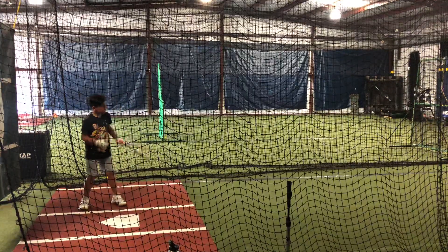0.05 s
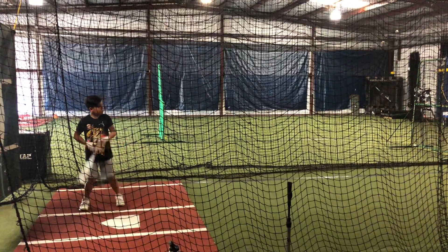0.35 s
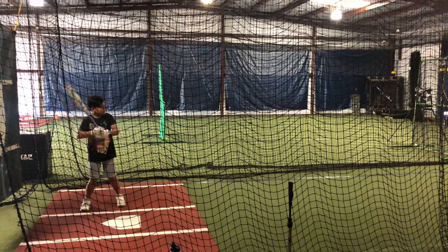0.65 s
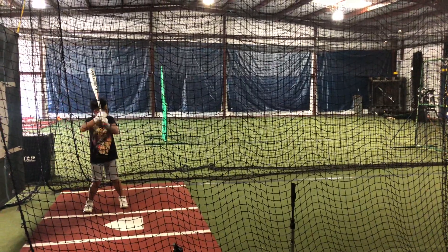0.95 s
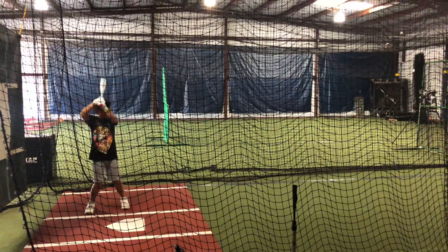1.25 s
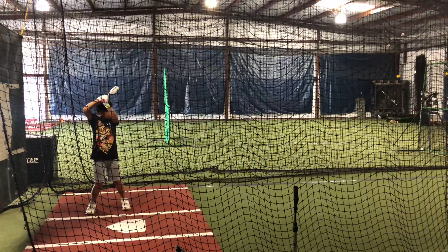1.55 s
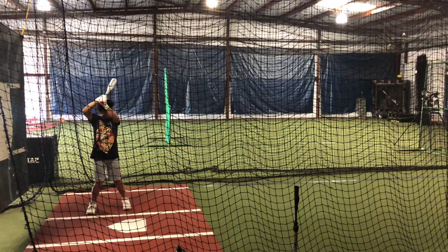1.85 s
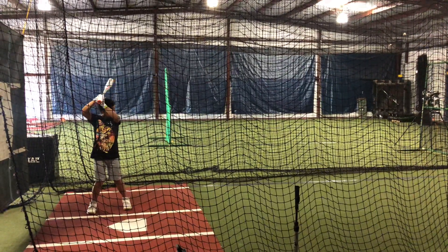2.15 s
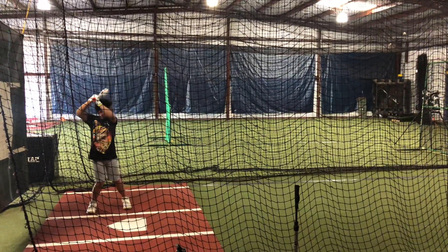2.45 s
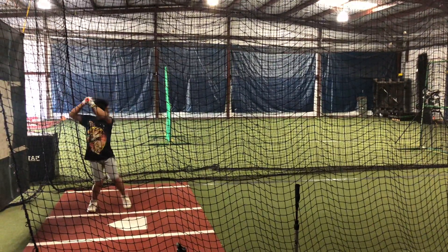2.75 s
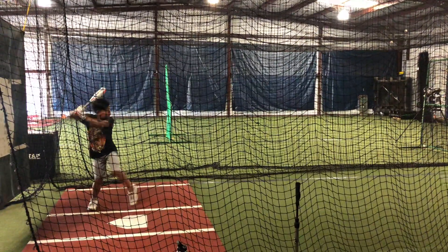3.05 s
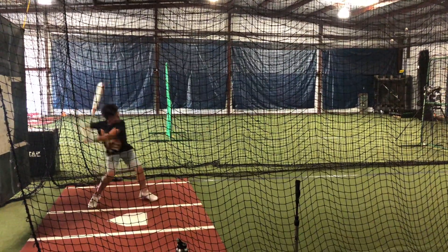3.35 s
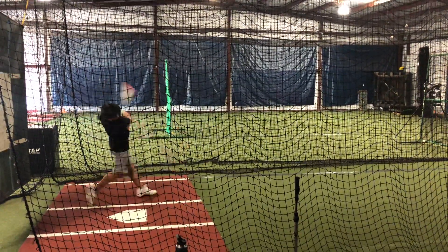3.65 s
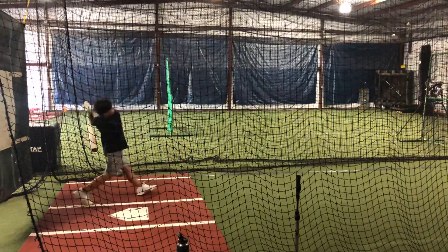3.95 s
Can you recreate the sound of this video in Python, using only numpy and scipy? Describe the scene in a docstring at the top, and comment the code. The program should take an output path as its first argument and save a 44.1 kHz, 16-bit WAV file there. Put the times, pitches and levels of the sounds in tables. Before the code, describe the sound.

A bat hits a ball with a sharp crack that echoes through an indoor batting cage. Before it, a pitching machine hums quietly, then throws with a ringing thump. Afterwards the ball thuds into netting and padding.

```python
"""A bat cracks a ball in an indoor batting cage: a short dry snap, echoes off the walls and roof,
and a hall that holds the bat's ring. Just after, the ball thuds into the netting and padding.
Half a second before the hit, a pitching machine throws the ball from between two spinning wheels.
The machine buzzes, ticks and hums throughout, over faint lamps and a steady hiss of air."""
import sys
import numpy as np
from scipy import signal
from scipy.fft import rfft, irfft
from scipy.io import wavfile

SR = 44100
rng = np.random.default_rng(int(sys.argv[2]) if len(sys.argv) > 2 else 0)


def inscribe(sig):
    """Save sig as 16-bit PCM at rate SR to the path in sys.argv[1].

    A 1-D sig is mono; a 2-D sig holds one channel per row.
    Samples are clipped to [-1, 1] before scaling.
    """
    pcm = np.round(np.clip(np.atleast_2d(sig).T, -1, 1) * 32767)
    wavfile.write(sys.argv[1], SR, pcm.astype(np.int16))


N = 176400
T = np.arange(N) / SR
HZ = np.fft.rfftfreq(N, 1 / SR)
HIT_S, HALL_DELAY_S = 3.5424, 0.014


# Tone of the snap as bat meets ball: pitch_hz, relative_db
SNAP_TONE = [(100, -29), (1500, -1), (5000, 12.5), (9000, 2.5), (12000, 9.5), (15000, 11)]
# Tone of the ball being squashed: pitch_hz, relative_db
CRUNCH_TONE = [(60, -2), (300, -2), (650, -7), (1000, 12), (1500, 3.5), (2100, 1), (2800, 7), (5000, -2.5),
               (7500, -11), (10000, -6), (12200, -26), (15000, -15)]
# Notes that bat and ball ring at: pitch_hz, relative_db, ring_s (time to fade by 60 dB)
BAT_NOTES = [(860, -2.5, .011), (1025, -2, 0.018), (1600, -6, 0.02), (1840, -14, 0.029),
             (2740, 2.5, 0.0094), (3330, -18, 0.029), (4400, -20, 0.0052)]

def bat_crack():
    """The bat hits the ball: a bright snap, a hollow crunch and a ring that dies quickly."""
    snap = unit(colour(burst(HIT_S, decay_s=0.0001), amp(read(SNAP_TONE, HZ))))
    crunch = unit(colour(burst(HIT_S, decay_s=0.0035), amp(read(CRUNCH_TONE, HZ))))
    notes = ring(HIT_S + 0.000808, BAT_NOTES)  # starts as the ball leaves the bat
    return amp(17.5) * snap + amp(12.5) * crunch + amp(-5.5) * notes


# Tone the hit sends into the hall: pitch_hz, relative_db
ECHO_TONE = [(40, -36), (150, -1), (300, -2), (500, -0.5), (900, 0), (1350, 0), (2100, 2.5), (3300, -1),
             (4300, -0.5), (6000, -5), (9500, -9.5), (12200, -16), (15000, -12)]
# Where the bat's barrel rings: pitch_hz, width_hz, relative_db
BARREL_PEAKS = [(1609, 64, 13.7), (1720, 110, 3.5), (2460, 140, 3.1), (2600, 102, 10.5), (4120, 93, 1.5)]
# Bounces off the walls and roof: delay_s, relative_db, decay_s
WALL_SLAPS = [(0.015, 1.5, 0.0068), (0.0196, -8, 0.0012), (0.0233, -1, 0.0021), (0.03, -4, 0.0055),
              (0.0401, -4.5, 0.0033), (0.075, -11, 0.0035), (.082, -13, .004), (.088, -2, 0.012),
              (.131, -10, 0.0082), (0.214, -12.5, 0.022)]

def bat_echoes():
    """The crack comes back as slaps, duller the later they are, and a long tail with the bat's ring."""
    tone = evened(np.hypot(amp(read(ECHO_TONE, HZ)), bumps(BARREL_PEAKS, HZ)))
    loss_db_per_s = 4.5 * HZ / 1000  # high pitches lose the most on the way
    slaps = sum(amp(db) * unit(colour(burst(HIT_S + delay, decay), tone * amp(-loss_db_per_s * delay)))
                for delay, db, decay in WALL_SLAPS)
    tail = unit(colour(hall(HIT_S + HALL_DELAY_S), tone))
    return amp(12) * slaps + amp(18) * tail


# The ball landing in netting and padding: start_s, level_db, pitch_hz, width_hz, decay_s
BALL_BLOWS = [(3.614, 1.5, 484, 396, 0.034), (3.768, -8, 146, 44.7, 0.041), (3.805, -4, 155, 35.8, 0.14)]

def ball_thuds():
    """The ball lands with dull blows, and the net's cords give a brief zip."""
    blows = sum(amp(db) * unit(colour(burst(start, decay), bumps([(hz, width, 0)], HZ)))
                for start, db, hz, width, decay in BALL_BLOWS)
    cords = unit(colour(burst(3.751, decay_s=0.025), bumps([(5970, 5200, 0)], HZ)))
    return blows + amp(-11) * cords


# The ball scuffing between the wheels: start_s, relative_db, decay_s
THROW_SCUFFS = [(2.992, -13, 0.0092), (2.998, -5.5, 0.016), (3.011, -9, 0.004), (3.019, -5.5, 0.01)]
# Tone of the throw: pitch_hz, relative_db
THROW_TONE = [(29, -49), (50, -22.5), (223, 0), (291, -12.5), (398, -11), (822, -12), (905, -8.5),
              (1960, -12), (3760, -13), (4140, -16), (6090, -17), (14500, -23), (16000, -27)]
# Groups of close notes in the machine's frame: pitch_hz, width_hz, level_db, ring_s
FRAME_NOTES = [(221.3, 9.6, -5, 0.5), (398, 20, -9.5, 0.34), (1070, 100, -15, 0.22),
               (1670, 110, -9.5, 0.94), (3280, 40, -16, 1), (5970, 29, -12, 1), (7970, 50, -16, 0.29)]

def machine_throw():
    """The wheels grab and throw the ball; the frame and the hall ring on."""
    scuffs = unit(sum(amp(db) * burst(start, decay) for start, db, decay in THROW_SCUFFS))
    jolt_s = THROW_SCUFFS[1][0]
    throw = unit(colour(scuffs + hall(jolt_s + HALL_DELAY_S), amp(read(THROW_TONE, HZ))))
    frame = sum(amp(db) * cluster(jolt_s, hz, width, ring_s) for hz, width, db, ring_s in FRAME_NOTES)
    return amp(2.5) * throw + frame


def batter_swing():
    """The batter's front foot scuffs the mat, then air rushes round the swinging bat."""
    scuff = evened(colour(rng.standard_normal(N), bumps([(920, 1900, 0)], HZ)))
    rush = evened(colour(rng.standard_normal(N), 1 / (1 + HZ / 350)))
    foot = amp(-55.5) * scuff * np.exp(-((T - 3.42) / 0.066) ** 2)
    swish = amp(-44.5) * rush * np.exp(-((T - 3.537) / 0.029) ** 2)
    return foot + swish


# Where the wheel's rattle is strongest: pitch_hz, width_hz, relative_db
RATTLE_PEAKS = [(1054, 134, -1), (2584, 430, -1.5), (4480, 340, -3.5), (5630, 510, 2), (6600, 110, -0.5),
                (7580, 1200, -4.5), (8800, 350, -2)]
# Where the wheel's housing rings: pitch_hz, width_hz, relative_db
HOUSING_PEAKS = [(2570, 117, -1.9), (2664, 73, 0.9)]
# How loud the housing whines over time: time_s, level_db
WHINE_LEVELS = [(0, -68), (.3, -66.5), (.7, -69), (1.15, -66), (1.45, -68), (1.75, -63), (2.2, -65),
                (2.9, -62.5), (3.3, -64)]

def wheel_buzz():
    """The faster wheel rattles once a turn and rubs three times, ringing the housing and the hall."""
    turns = wheel_turns(per_s=35.95 + 0.00676 * drift(rate_hz=0.88))
    rattles = evened(pulses(turns)) + 0.13 * rng.standard_normal(N)  # noise roughens the clicks
    rattles = rattles + amp(5.5) * signal.fftconvolve(rattles, hall(0))[:N]
    rubs = evened(pulses(turns * 3))
    buzz = evened(colour(rattles, bumps(RATTLE_PEAKS, HZ)))
    whine = evened(colour(rubs + 0.5 * evened(rattles), bumps(HOUSING_PEAKS, HZ)))
    whine_db = np.interp(T, *np.transpose(WHINE_LEVELS))
    return amp(-63) * buzz + amp(whine_db) * whine


# Tone of the wheel's thin, high tick: pitch_hz, relative_db
TICK_TONE = [(500, -53), (3000, -34), (5500, -7.5), (9500, -10), (10250, 4.5), (10650, -10), (11080, 5),
             (11400, -9.5), (12000, -6.5), (13500, -8), (14400, 1.5), (14900, -0.5), (15400, 6),
             (16000, -4)]

def wheel_ticks():
    """The slower wheel ticks once a turn: the same click, rattle and short ring every time."""
    turns_per_s, first_s = 25.273, 0.0004
    click = T == 0
    rattle = amp(-2) * burst(0, decay_s=0.0014)
    ringing = amp(-0.5) * burst(0, decay_s=0.022)
    turns = wheel_turns(turns_per_s) - first_s * turns_per_s
    ticks = signal.fftconvolve(pulses(turns), click + rattle + ringing)[:N]
    return amp(-57) * evened(colour(ticks, amp(read(TICK_TONE, HZ))))


# Low notes of the motor: pitch_hz, first_level_db, settled_level_db
MOTOR_NOTES = [(84, -47, -57), (101.5, -67, -68.5), (115.6, -50.5, -54), (129.3, -57.5, -63.5),
               (151.5, -54, -59), (164, -69, -71.5), (191, -62, -79.5), (208, -64.5, -88)]

def motor_hum():
    """The motor hums on low notes that waver and settle to a quieter level."""
    settle_span_s, waver_db, waver_hz = [0.85, 2.2], 2.6, 0.33
    hum = np.zeros(N)
    for hz, first_db, settled_db in MOTOR_NOTES:
        level_db = np.interp(T, settle_span_s, [first_db, settled_db]) + waver_db * drift(rate_hz=2.9)
        cycles = np.cumsum(hz + waver_hz * drift(rate_hz=5.3)) / SR + rng.random()
        hum += amp(level_db) * np.sin(2 * np.pi * cycles)
    return hum


# Notes in the lamps' buzz: pitch_hz, level_db
LAMP_NOTES = [(360, -80), (480, -75.5), (840, -77.5), (960, -79), (1080, -76)]

def lamp_buzz():
    """Mains power makes the lamps buzz, faint and steady."""
    return sum(amp(db) * np.sin(2 * np.pi * (hz * T + rng.random())) for hz, db in LAMP_NOTES)


# Tone of the air in the hall: pitch_hz, relative_db
AIR_TONE = [(20, -28), (40, -3), (65, 5), (130, -1), (230, -0.5), (330, -10.5), (700, -13.5), (1080, -16.5),
            (1400, -13), (2000, -15), (2600, -14), (3700, -15.5), (5700, -18.5), (7200, -17.5),
            (8700, -13.5), (9500, -18.5), (11100, -10), (12000, -19), (13500, -24), (15500, -19)]

def air_hiss():
    """The hall's air gives a steady hiss and rumble."""
    noise = irfft(rfft(rng.standard_normal(N)) * amp(read(AIR_TONE, HZ)), N)
    return amp(-55) * evened(noise)


# How long the hall takes to fade by 60 dB: pitch_hz, ring_s
HALL_RING_TIMES = [(100, 1.53), (250, 1.13), (600, 0.71), (1100, 0.77), (1650, 0.91), (2700, 0.94),
                   (4200, 1.04), (6000, 0.88), (9000, 0.64), (15000, 0.34)]

def hall(start_s, rise_s=0.0086):
    """Many echoes blur into one tail; each pitch fades at its own speed."""
    hz, t, bands = signal.stft(rng.standard_normal(N), SR, nperseg=256)
    fade = np.exp(-np.log(1000) * np.maximum(t - start_s, 0) / read(HALL_RING_TIMES, hz)[:, None])
    tail = signal.istft(bands * fade, SR)[1][:N]
    return unit(tail * np.clip((T - start_s) / rise_s, 0, 1))


def wheel_turns(per_s, throw_s=3.0):
    """Counts the turns of a wheel that drops about 5% in speed as it throws the ball."""
    return np.cumsum(per_s * np.where(T < throw_s, 1, 0.951)) / SR


def pulses(turns):
    """One sharp click at each whole turn."""
    at = np.interp(np.arange(np.ceil(turns[0]), turns[-1]), turns, np.arange(N))
    near = np.round(at).astype(int)[:, None] + np.arange(-8, 9)
    offset = near - at[:, None]
    clicks = np.sinc(offset) * np.cos(offset * np.pi / 18) ** 2  # lets a click fall between samples
    return np.bincount(near.ravel() % N, clicks.ravel(), N)


def ring(start_s, notes):
    """The pure, fading notes of something struck."""
    t = np.maximum(T - start_s, 0)
    return sum(amp(db) * np.exp(-np.log(1000) * t / ring_s) * np.sin(2 * np.pi * hz * t)
               for hz, db, ring_s in notes)


def cluster(start_s, hz, width_hz, ring_s):
    """Many close notes struck together: a wobbling ring of energy 1."""
    band = irfft(rfft(rng.standard_normal(N)) * bumps([(hz, width_hz, 0)], HZ), N)
    return unit(band * fall(start_s, ring_s / np.log(1000)))


def burst(start_s, decay_s):
    """A dying burst of noise of energy 1."""
    return unit(rng.standard_normal(N) * fall(start_s, decay_s))


def fall(start_s, decay_s):
    """Jumps to 1, then fades to about a third every decay_s."""
    return (T >= start_s) * np.exp(-np.maximum(T - start_s, 0) / decay_s)


def drift(rate_hz):
    """A slow random wander of typical size 1."""
    return evened(irfft(rfft(rng.standard_normal(N)) / (1 + (HZ / rate_hz) ** 4), N))


def colour(x, gain):
    """Turns each pitch up or down by its gain, adding no sound ahead of a hit."""
    log_gain = np.log(np.maximum(gain, 1e-5))
    mirrored = np.concatenate([log_gain, log_gain[-2:0:-1]])
    taps = np.fft.ifft(np.exp(np.conj(signal.hilbert(mirrored)))).real[:4096]
    return signal.fftconvolve(x, taps)[:N]


def bumps(peaks, hz):
    """A gain curve with a bump at each pitch where something rings."""
    return np.sqrt(sum((amp(db) / (1 + ((hz - pitch) / width) ** 2)) ** 2 for pitch, width, db in peaks))


def read(points, hz):
    """Reads between a table's rows, with octaves evenly spaced."""
    pitch, value = np.transpose(points)
    return np.interp(np.log(hz + 1), np.log(pitch + 1), value)


def amp(db):
    """Decibels to gain."""
    return 10 ** (np.asarray(db) / 20)


def evened(x):
    """Scales to an average power of 1."""
    return x / np.sqrt(np.mean(x ** 2) + 1e-20)


def unit(x):
    """Scales to a total energy of 1."""
    return x / np.sqrt(np.sum(x ** 2) + 1e-20)


def scene():
    """All the sources add up at one microphone."""
    background = air_hiss() + motor_hum() + lamp_buzz() + wheel_buzz() + wheel_ticks()
    action = machine_throw() + batter_swing() + bat_crack() + bat_echoes() + ball_thuds()
    return (background + action)[None]


def record(dry):
    """The microphone softly squashes the loud crack, then loses the deepest bass and highest treble."""
    ceiling, low_cut_hz, high_cut_hz = 0.48, 59, 15900
    squashed = ceiling * np.tanh(dry / ceiling)
    heard = signal.sosfilt(signal.butter(2, low_cut_hz, "high", fs=SR, output="sos"), squashed)
    treble_cut = signal.firwin(511, high_cut_hz, window=("kaiser", 9), fs=SR)
    return signal.oaconvolve(heard, treble_cut[None], "same")


dry = scene()
out = record(dry)
inscribe(out)
```